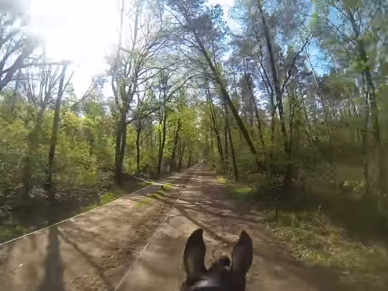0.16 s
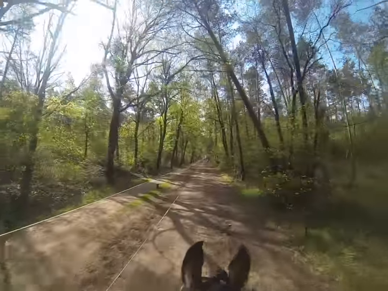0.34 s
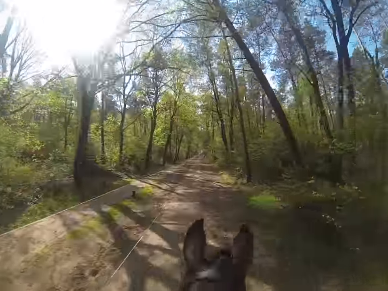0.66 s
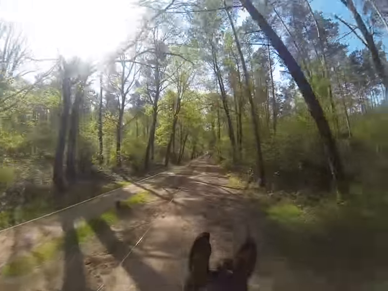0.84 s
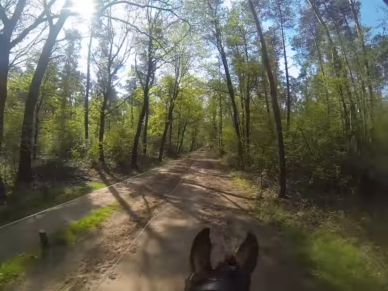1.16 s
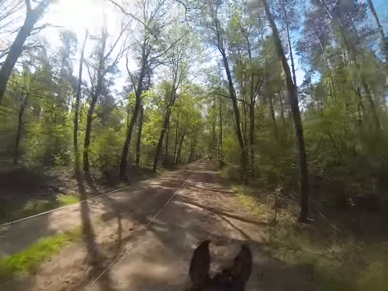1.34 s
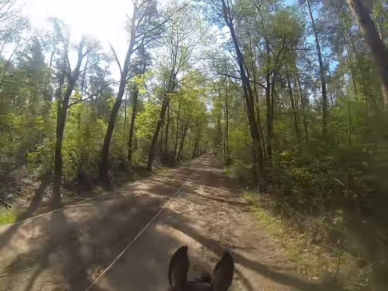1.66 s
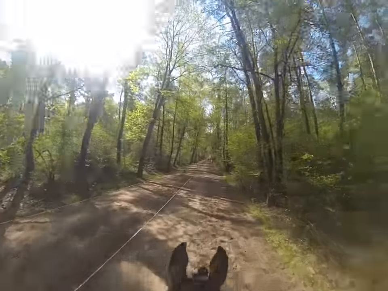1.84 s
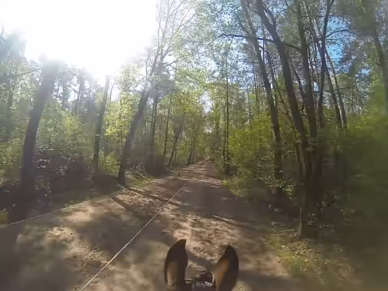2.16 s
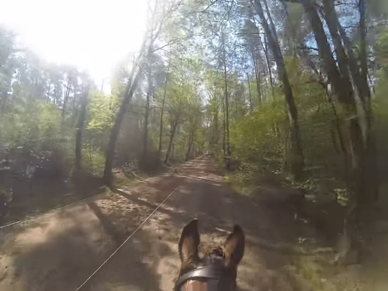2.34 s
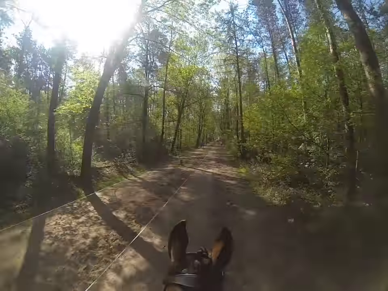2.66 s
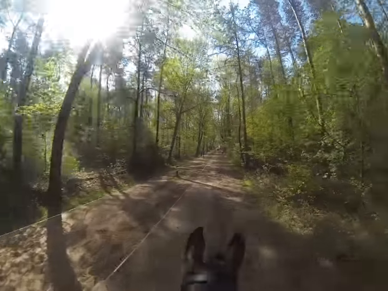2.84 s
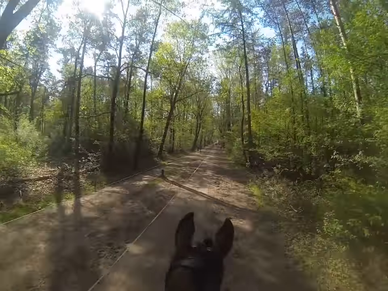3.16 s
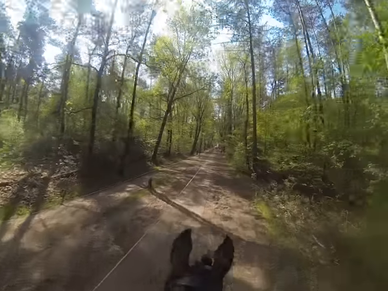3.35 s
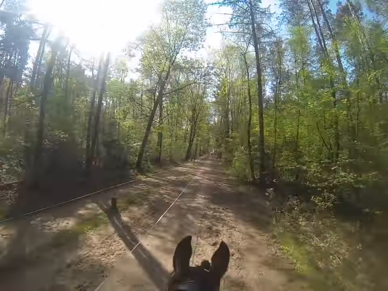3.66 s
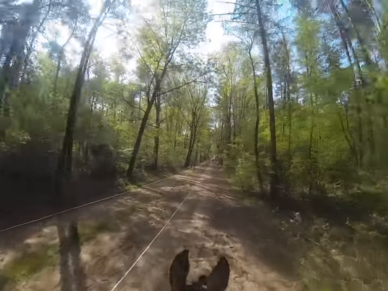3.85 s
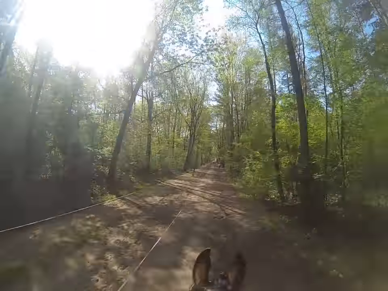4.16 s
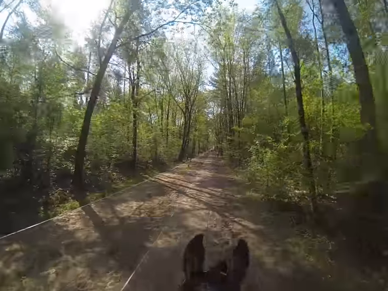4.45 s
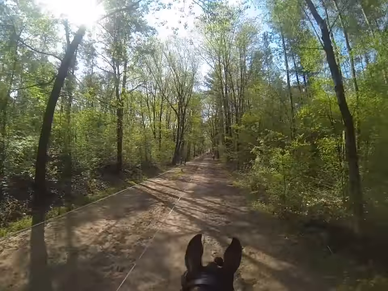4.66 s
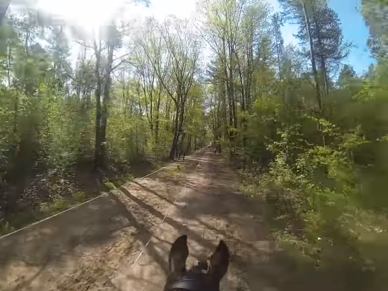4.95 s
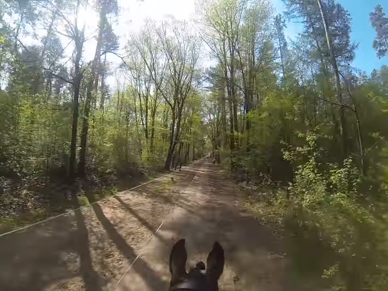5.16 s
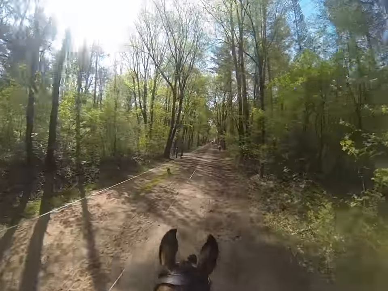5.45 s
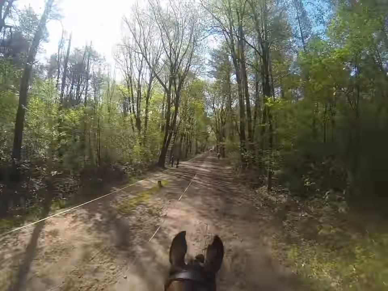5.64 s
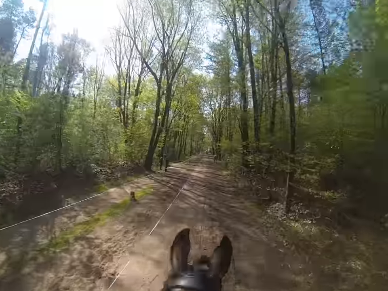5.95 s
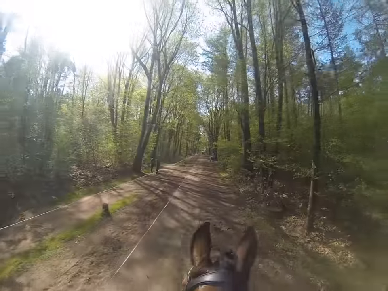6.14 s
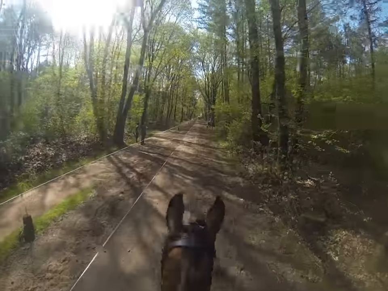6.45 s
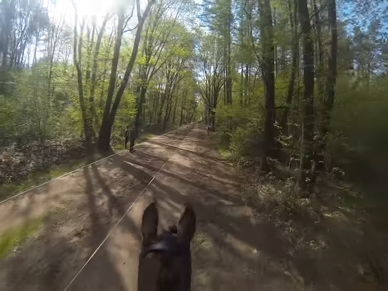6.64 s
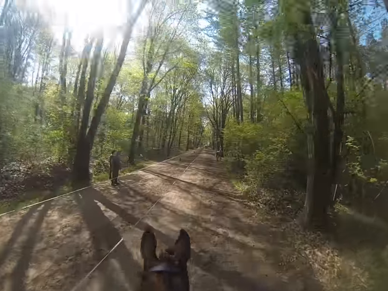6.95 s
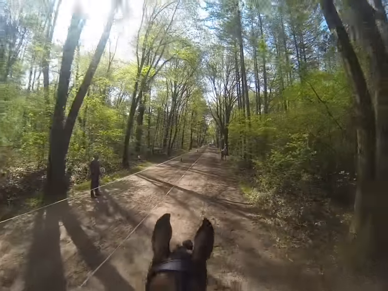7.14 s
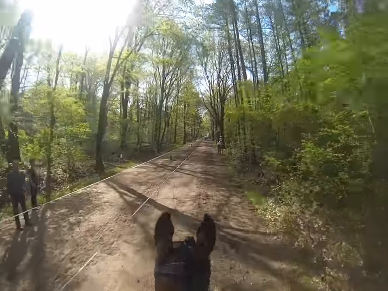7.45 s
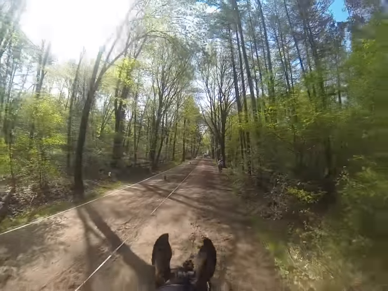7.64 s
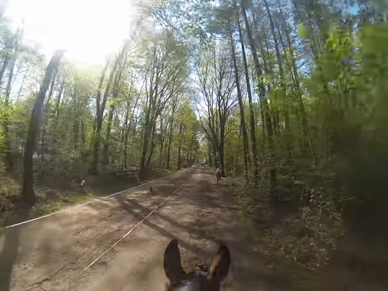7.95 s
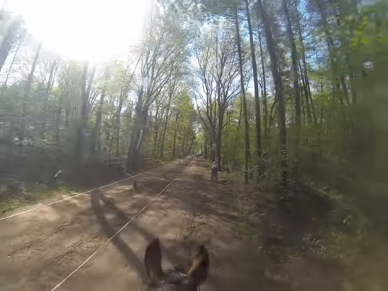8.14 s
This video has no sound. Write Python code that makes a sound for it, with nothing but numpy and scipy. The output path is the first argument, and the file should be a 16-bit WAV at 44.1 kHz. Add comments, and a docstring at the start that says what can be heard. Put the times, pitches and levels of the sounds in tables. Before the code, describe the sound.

A horse canters on a sandy forest track for about eight seconds, heard close from a camera worn by the rider. Strides come a little over half a second apart, each with three deep, dull thuds and short hollow clops, uneven in weight. The heaviest land at about 0.4, 6.5, 7.5 and 8.1 seconds; around 4.2 they almost vanish. Wind runs throughout as a fluttering, slightly hollow rush over a low buffeting rumble, strongest at the start and weakest near 6.6 seconds. Brief gritty sand scuffs come near 0.1, 1.7, 2.8, 3.6 and 4.1 seconds. The plastic housing clacks lightly on some jolts, as at 0.4, 2.5 and 4.8 seconds, knocks hardest at 6.4 with a brief rattle, and knocks again at 7.5 and 8. A faint, high electronic whine and hiss continue underneath.

```python
"""A sandy forest track, heard from a camera worn by the rider of a cantering horse.
Each stride lands three hoof falls: dull thuds that rock the camera mount, each with a short hollow clop.
Now and then sand scuffs up, and some of the jolts knock the plastic housing against its stop;
after the hardest knock it rattles briefly. Air rushes over the housing and rings its cavity,
wind buffets the microphone, and the electronics whine faintly."""
import sys
import numpy as np
from scipy import signal
from scipy.fft import rfft, irfft, next_fast_len
from scipy.io import wavfile
from scipy.ndimage import uniform_filter1d, map_coordinates

SR = 44100
rng = np.random.default_rng(int(sys.argv[2]) if len(sys.argv) > 2 else 0)


def put_to_file(sound):
    """Save the sound as 16-bit audio at rate SR, in the file named by the first command-line argument."""
    columns = np.atleast_2d(sound).T  # one column per channel
    safe = np.clip(columns, -1, 1)
    whole_steps = np.round(safe * 32767)
    wavfile.write(sys.argv[1], SR, whole_steps.astype(np.int16))


N = 366027
T = np.arange(N) / SR

# The three-beat canter. Each row: time of the middle beat, lead of the first and lag of the last in
# seconds, then the weight of the first, middle and last beat and the ground's hardness in dB.
STRIDES = [(-.11, .14, .174, -30, -32, -22, 0), (.404, .168, 0.21, -21.5, -13, -27, -2.5),
           (.968, .155, 0.22, -33, -23.5, -25.5, 1.5), (1.502, 0.087, 0.16, -26, -30, -21.5, 4),
           (2.008, 0.1, 0.29, -34, -25, -42, -4), (2.595, 0.15, 0.18, -28, -23.5, -26, -1),
           (3.108, 0.041, .187, -22.5, -16.5, -22.5, 3), (3.697, 0.15, 0.15, -24.5, -16.5, -23, -0.5),
           (4.191, .14, .114, -36, -37, -40, -6), (4.783, 0.13, 0.1, -23, -19.5, -27, 3),
           (5.336, 0.12, .24, -28, -21.5, -28, -2.5), (5.890, .08, 0.17, -31, -25, -22.5, -5),
           (6.458, 0.17, 0.21, -21, -8, -34, -1.5), (6.978, 0.19, 0.16, -49, -24.5, -24, -7),
           (7.523, .13, 0.16, -29, -13, -24, -5), (8.062, 0.11, 0.15, -29, -9.5, -51, -15)]
USUAL_JOLT_DB = -22.5
REBOUND_S = 0.0245  # the mount swings back, jolting itself and the housing again


def undb(db):
    """Decibels to gain."""
    return 10 ** (np.asarray(db) / 20)


def unit(x):
    """Scale to rms 1."""
    return x / np.std(x)


def noise(colour):
    """Noise with a spectrum drawn through (Hz, dB) points."""
    hz, db = np.transpose(colour)
    size = next_fast_len(N)
    log_hz = np.log(np.fft.rfftfreq(size, 1 / SR) + 1e-3)
    gain = undb(np.interp(log_hz, np.log(hz), db, left=-100, right=-100))
    return unit(irfft(rfft(rng.standard_normal(size)) * gain, size)[:N])


def walk(rate):
    """A smooth random drift with spread 1, through `rate` points a second."""
    points = rng.standard_normal(4096)
    return unit(map_coordinates(points, [T * rate], order=3, mode="wrap"))


def ring(t, hz, t60):
    """A struck mode that dies by 60 dB in t60 seconds."""
    return np.sin(2 * np.pi * hz * t) * np.exp(-np.log(1000) * t / t60)


def add(out, s, sound):
    """Mix a sound in at s seconds."""
    start = int(s * SR)
    part = sound[max(-start, 0):max(N - start, 0)]
    out[max(start, 0):max(start, 0) + len(part)] += part


def footfalls():
    """The three beats of every stride as (seconds, weight in dB, hardness in dB)."""
    return [(at, db, hard_db) for s, early, late, first_db, middle_db, last_db, hard_db in STRIDES
            for at, db in ((s - early, first_db), (s, middle_db), (s + late, last_db))]


def rocking(lag_s):
    """A swing between -1 and 1 that peaks lag_s after the middle beat of each stride."""
    beats = np.array(STRIDES)[:, 0]
    beats = np.append(beats, 2 * beats[-1] - beats[-2])
    return np.cos(2 * np.pi * np.interp(T - lag_s, beats, np.arange(len(beats))))


def headwind(usual_db=-38, surge_db=0.33):
    """Air flow in dB above the usual, surging as the rider rocks into the wind once a stride."""
    # The headwind's swells. Each row: time in seconds, strength in dB.
    swells = [(0.0, -34), (0.44, -34.5), (0.81, -37), (1.25, -37.5), (1.52, -38), (1.9, -36.5), (2.56, -41),
              (2.89, -38.5), (3.61, -38.5), (4.11, -36.5), (4.57, -37.5), (6.06, -39.5), (6.26, -40),
              (6.45, -43), (6.66, -44.5), (6.96, -40), (7.65, -41), (8.3, -40.5)]
    times, strength_db = np.transpose(swells)
    return np.interp(T, times, strength_db) - usual_db + surge_db * rocking(lag_s=0.24)


def whine(whine_hz=6449.5, frame_hz=47.952, duty=0.44, tone_db=-63, octave_db=-61, hiss_db=-77):
    """The camera's electronics whistle in a short burst on every frame, over a faint hiss."""
    frame = T * frame_hz + 0.19
    gate = uniform_filter1d((frame % 1 < duty) * 1., size=30)
    slip = 2 * rng.standard_normal(1024)[frame.astype(int)]  # every burst starts out of step
    phase = 2 * np.pi * whine_hz * T
    tones = undb(tone_db) * np.sin(phase + slip) + undb(octave_db) * np.sin(2 * phase + slip)
    return gate * tones + undb(hiss_db) * unit(rng.standard_normal(N))


def air_rush(cavity_hz=1299, width_hz=83, rush_db=-39, cavity_db=-43, hiss_db=-55, flutter_db=0.88):
    """Air streams past the housing, fluttering with its eddies and ringing the microphone's cavity."""
    # Colours of the midrange rush and the hiss above it. Each row: frequency in Hz, level in dB.
    rush_colour = [(450, -15), (700, -15), (880, -6.5), (1100, -10.5), (1250, -4.5), (1400, -2),
                   (1620, -2.5), (2000, -15), (2200, -14), (2550, -24.5), (3200, -50)]
    hiss_colour = [(2000, -8.5), (2600, 0), (3050, 5), (3500, -4.5), (4200, -11), (5150, -6.5),
                   (5700, -15.5), (7500, -20.5), (10500, -29.5), (14500, -37)]
    flow_db, eddies = headwind(), walk(rate=22)
    cavity = rng.standard_normal(N)
    for q in (cavity_hz / width_hz, 3):  # a narrow resonance, then a broad one to trim its skirts
        cavity = unit(signal.lfilter(*signal.iirpeak(cavity_hz, q, fs=SR), cavity))
    body = undb(rush_db) * noise(rush_colour) + undb(cavity_db) * cavity
    hiss = noise(hiss_colour) * undb(hiss_db + 1.06 * (flow_db + eddies))  # swings a little wider
    return undb(flow_db + flutter_db * eddies) * body + hiss


def buffeting(buffet_db=-37, rumble_db=-30, gust_db=1.76, tremble_db=2.5, wind_growth=0.62):
    """Eddies beat on the microphone and keep the mount trembling."""
    # Colours of the wind's beating and the mount's rumble. Each row: frequency in Hz, level in dB.
    buffet_colour = [(60, -11), (110, 2), (165, 5.5), (215, -5), (290, -1), (430, -7.5), (490, -5),
                     (540, -13), (700, -16.5), (1200, -56.5)]
    rumble_colour = [(10, -12), (25, -3), (36, 3), (44, -4), (58, -6), (84, -14), (180, -20.5)]
    beating = noise(buffet_colour) * undb(buffet_db + gust_db * walk(rate=35))
    stride_db = tremble_db * rocking(lag_s=0.017)  # most with the hooves down, least while airborne
    trembling = noise(rumble_colour) * undb(rumble_db + stride_db - 0.5 * walk(rate=19))
    return undb(wind_growth * headwind()) * (beating + trembling)


def scuffs_and_rattle(grain_db=3):
    """Short grainy bursts: sand scuffed by hooves, and the housing's rattle after its hardest knock."""
    # The bursts; the one at 6.46 s is the rattle.
    # Each row: peak time and half-width in seconds, fine hiss and coarse crunch levels in dB.
    bursts = [(.068, 0.014, -56, -30), (0.402, 0.016, -60, -37), (1.713, 0.028, -62, -38),
              (2.812, 0.039, -61, -39), (3.122, 0.0096, -56, -49), (3.344, .025, -59, -38),
              (3.567, 0.015, -58, -30), (4.14, 0.036, -62, -37), (6.326, 0.016, -58.5, -35),
              (6.463, .008, -54.5, -32), (7.985, .018, -59, -38)]
    # Colours of the fine hiss and the coarse crunch. Each row: frequency in Hz, level in dB.
    fine_colour = [(1500, -1), (3000, 2.5), (4000, -8), (5200, 3.5), (6500, -6), (9000, -16.5),
                   (13000, -20)]
    coarse_colour = [(250, -11), (500, 2), (700, -5), (900, 5), (1100, -18.5), (1300, 13), (1650, 1.5),
                     (2100, -12), (3000, -10.5), (4000, -28)]
    fine, coarse = noise(fine_colour), noise(coarse_colour)
    out = sum(np.exp(-((T - s) / width) ** 2) * (undb(fine_db) * fine + undb(coarse_db) * coarse)
              for s, width, fine_db, coarse_db in bursts)
    return out * undb(grain_db * walk(rate=400))


def housing_knocks(contact_s=0.00029, crack_s=0.0024, crack_db=-8, bright_hz=2300, clack_db=-1):
    """The housing hits its stop and bounces once: a low bump, a brief crack and a ringing tick."""
    # The hits. Each row: start in seconds, then relative clack level, brightness and bump level in dB.
    hits = [(0.3912, -15.5, -14, -14.5), (.967, -26.5, -1, -40), (2.523, -18.5, -14, -21.5),
            (2.909, -23, -13, -26.5), (3.106, -19.5, -11, -32), (4.781, -18, -6.5, -20),
            (5.335, -22, -12, -33), (5.868, -21, -8, -44), (5.999, -25, -7, -20), (6.318, -27, -8, -38),
            (6.4472, -12, -6.5, -4.5), (7.5105, -14, -2.5, -10.5), (8.0495, -18, -3, -11)]
    # The plastic's modes. Each row: frequency in Hz, 60 dB ring time in seconds, relative level in dB.
    modes = [(443, 0.0079, -9.5), (854, 0.013, -9), (1380, 0.0086, -10.5), (1663, 0.026, -4),
             (1890, 0.017, -11), (2860, 0.0073, -4), (3190, 0.009, -6), (3400, 0.0036, -10),
             (4140, 0.0053, -16), (5200, 0.0049, -17.5)]
    # Colour of the crack. Each row: frequency in Hz, level in dB.
    crack_colour = [(900, -4), (1800, 11), (3200, -0.5), (4000, -6.5), (5600, -23), (6200, -23),
                    (8000, -25), (12000, -40)]
    out, t = np.zeros(N), T[:SR // 12]
    crack_noise = noise(crack_colour)
    contact = 1 - np.exp(-(t / contact_s) ** 2)  # plastic gives a little, which dulls the attack
    for i, (s, db, bright_db, bump_db) in enumerate(hits):
        detune = 1 + 0.012 * rng.standard_normal(len(modes))
        tick = sum((-1) ** k * undb(mode_db + bright_db * (hz > bright_hz)) * ring(t, hz * detune[k], t60)
                   for k, (hz, t60, mode_db) in enumerate(modes))
        burst = crack_noise[i * len(t):(i + 1) * len(t)]
        crack = undb(crack_db + bright_db) * burst * np.exp(-t / crack_s)
        clack = undb(db + clack_db) * (tick + crack)
        bump = undb(bump_db) * ring(t, hz=102, t60=0.086)
        add(out, s, contact * (clack - bump))
        add(out, s + REBOUND_S, contact * (undb(-24) * clack - undb(-3) * bump))  # a duller bounce
    return out


def hoof_clops(clop_db=-20, weight_growth=0.2, scatter=0.12):
    """A hoof landing flat rings for an instant, each a little differently."""
    # The hollow hoof. Each row: frequency in Hz, 60 dB ring time in seconds, relative level in dB.
    modes = [(272, 0.025, -6), (374, 0.0078, -3), (512, 0.014, -9), (796, 0.013, -16.5)]
    out, t = np.zeros(N), T[:SR // 10]
    for s, db, hard_db in footfalls():
        detune = 1 + scatter * rng.standard_normal(len(modes))
        clop = sum((-1) ** k * undb(mode_db) * ring(t, hz * detune[k], t60)
                   for k, (hz, t60, mode_db) in enumerate(modes))
        add(out, s, undb(clop_db + hard_db + weight_growth * (db - USUAL_JOLT_DB)) * clop)
    return out


def hoof_thuds(contact_s=0.0032, scatter=0.1, sink=0.41, rebound_db=-5.5, rebound_hard_db=5):
    """Each hoof fall rocks the mount twice; firmer ground wakes its higher modes."""
    # The mount on the rider, its deep sway first.
    # Each row: frequency in Hz, 60 dB ring time in seconds, relative level in dB.
    modes = [(41.95, 0.14, 12), (85, 0.077, 1), (126, 0.033, -11), (155, 0.059, -14.5)]
    (sway_hz, sway_t60, sway_db), *upper_modes = modes
    out, t = np.zeros(N), T[:SR // 3]
    sway = undb(sway_db) * ring(t, sway_hz, sway_t60)
    contact = 1 - np.exp(-t / contact_s)  # sand softens the attack
    for s, db, ground_db in footfalls():
        hard_db = ground_db - sink * (db - USUAL_JOLT_DB)  # a heavy hoof sinks deeper and lands duller
        for lag_s, drop_db, firm_db in ((0, 0, 0), (REBOUND_S, rebound_db, rebound_hard_db)):
            detune = 1 + scatter * rng.standard_normal(len(upper_modes))
            thock = sum(undb(mode_db) * ring(t, hz * detune[k], t60)
                        for k, (hz, t60, mode_db) in enumerate(upper_modes))
            thud = contact * (sway + undb(hard_db + firm_db) * thock)
            add(out, s + lag_s, -undb(db + drop_db) * thud)
    return out


def scene():
    """Hooves and housing knocks over wind and camera whine, in one channel."""
    canter = hoof_thuds() + hoof_clops() + scuffs_and_rattle() + housing_knocks()
    return (canter + air_rush() + buffeting() + whine())[None]


def record(dry):
    """The camera drops the bass below 8 Hz and cuts the top above 14.5 kHz."""
    sound = signal.sosfilt(signal.butter(1, 8, "high", fs=SR, output="sos"), dry)
    return signal.sosfilt(signal.ellip(10, .1, 80, 14500, fs=SR, output="sos"), sound)


dry = scene()
out = record(dry)
put_to_file(out)
```